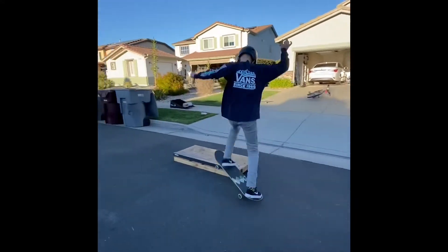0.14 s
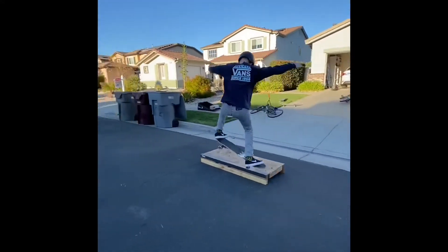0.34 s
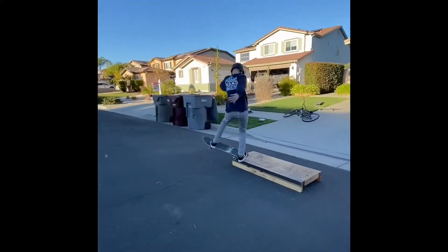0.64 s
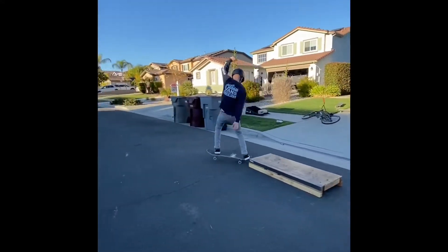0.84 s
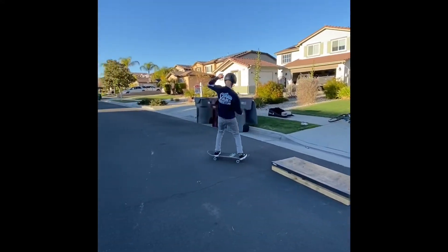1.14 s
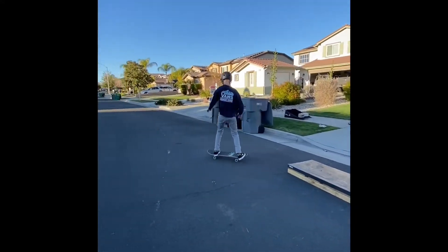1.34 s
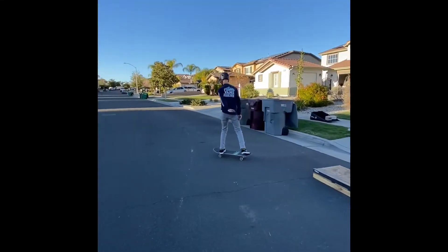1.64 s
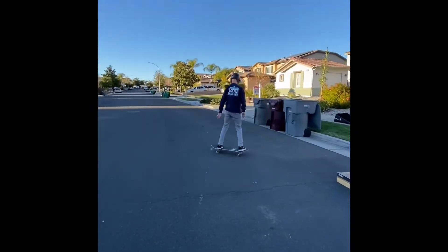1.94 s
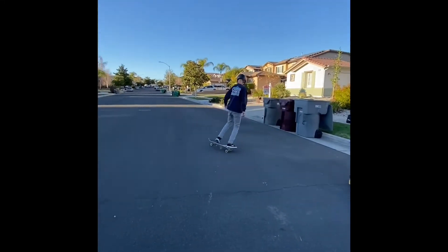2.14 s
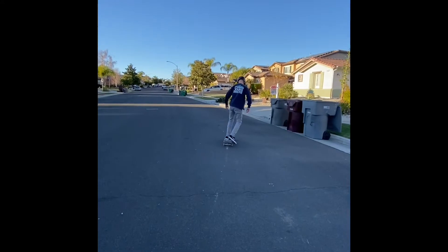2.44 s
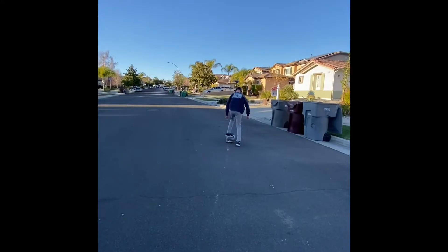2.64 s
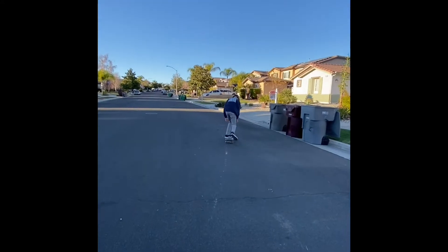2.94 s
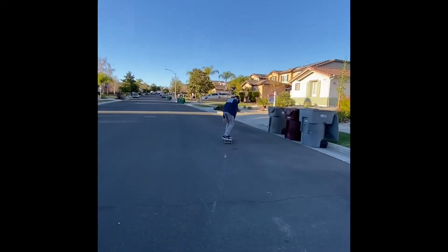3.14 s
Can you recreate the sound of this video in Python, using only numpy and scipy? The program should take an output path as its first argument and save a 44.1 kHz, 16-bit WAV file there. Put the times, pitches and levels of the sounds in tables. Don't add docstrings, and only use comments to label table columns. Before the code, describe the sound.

Skateboard pops, knocks across a hollow wooden box, lands with hard clacks, then rolls off gritty.

```python
import sys
import numpy as np
from scipy import signal
from scipy.fft import rfft, irfft, next_fast_len
from scipy.io import wavfile
from scipy.ndimage import uniform_filter1d

SR = 44100
rng = np.random.default_rng(int(sys.argv[2]) if len(sys.argv) > 2 else 0)


def gain_from_db(level_db):
    decades = np.asarray(level_db, float) / 20
    return 10 ** decades


def unload_audio(sound):
    columns = np.transpose(np.atleast_2d(sound))
    steps = np.round(np.clip(columns, -1, 1) * 32767)
    wavfile.write(sys.argv[1], SR, steps.astype(np.int16))


N = 145530


def evened(x):
    return x / np.sqrt(np.mean(x ** 2) + 1e-20)


def peaked(x):
    return x / abs(x).max()


def read(points, hz):
    f, value = np.transpose(points)
    return np.interp(np.log(hz + 1), np.log(f + 1), value)


def add(mix, s, sound):
    part = mix[round(max(s, 0) * SR):][:len(sound)]
    part += sound[:len(part)]


def colour(points):
    log_gain = read(points, abs(np.fft.fftfreq(4096, 1 / SR))) * np.log(10) / 20
    taps = np.fft.ifft(np.exp(np.conj(signal.hilbert(log_gain)))).real[:2048]
    return taps / np.linalg.norm(taps)


def coloured(x, taps):
    return signal.oaconvolve(x, taps)[:len(x)]


def ring(modes, detune, t):
    out = 0
    for (hz, db, t60), d in zip(modes, detune):
        out = out + gain_from_db(db - 60 * t / t60) * np.sin(2 * np.pi * hz * d * t)
    return out


# f/Hz, level/dB
STREET_COLOUR = [(20, -30), (50, -5.5), (100, 0.5), (170, -15.5), (600, -29.5), (1500, -38), (4000, -64),
                 (8000, -95)]


def street():
    a, b = rng.standard_normal((2, N))
    taps = colour(STREET_COLOUR)
    return gain_from_db(-48.5) * np.array([coloured(v, taps) for v in (a, .5 * a + .86 * b)])


# t/s, level/dB, f/Hz, t60/s
KNOCK = (2.5, -35.5, 421, 0.1)


def handling():
    s, db, hz, t60 = KNOCK
    modes = [(hz * ratio, db, t60) for ratio in (1, 0.48, 2.2)]
    knock = ring(modes, [1, 1, 1], np.arange(4000) / SR)
    out = np.zeros((2, N))
    add(out[0], s, coloured(knock, np.hanning(40) / 20))
    return out


# t/s, level/dB
CHIP_SNAPS = [(0.088, -36), (0.1366, -42), (0.17, -47), (0.198, -16), (0.4695, -31), (0.477, -31),
              (0.4894, -25), (0.6035, -34), (0.6205, -22), (0.635, -30), (0.6529, -18), (0.674, -34),
              (0.6917, -25), (0.7392, -40), (0.7821, -50), (0.83, -42), (0.8969, -39), (0.955, -36.5),
              (0.9862, -38), (1.0989, -43), (1.3019, -46), (1.3768, -50), (1.3897, -39), (1.4077, -40),
              (1.4655, -38), (1.5147, -35), (1.6033, -35), (1.6167, -32), (1.6454, -30), (1.704, -40),
              (1.8013, -33), (1.8342, -38), (1.891, -29.5), (1.9087, -34), (1.947, -35), (2.0657, -52),
              (2.0777, -33), (2.1034, -41), (2.18, -34), (2.2423, -38), (2.362, -31), (2.4488, -53),
              (2.476, -36), (2.4992, -39), (2.6549, -40), (2.6933, -39), (2.7906, -42), (3.2735, -43)]
# f/Hz, level/dB per Hz
CHIP_COLOUR = [(1500, -15), (3000, -4), (6000, -5), (9000, 6.5), (13000, -0.5), (16000, -8)]


def chips():
    rise_s, t60_s, trim_db = 0.00047, .018, 1.5
    t, out, taps = np.arange(900) / SR, np.zeros((2, N)), colour(CHIP_COLOUR)
    envelope = np.minimum(t / rise_s, 1) * gain_from_db(-60 * t / t60_s)
    for s, db in CHIP_SNAPS:
        for port, burst in zip(out, rng.standard_normal((2, len(t)))):
            add(port, s, gain_from_db(db + trim_db) * peaked(coloured(burst * envelope, taps)))
    return out


# t/s, level/dB, start f/Hz, end f/Hz, t60/s
DECK_FLEXES = [
    (.202, -16, 260, 150.7, 0.18),
    (0.479, -19.5, 301, 250, 0.079),
    (.537, -20.5, 260, 192, 0.11),
]


def flexes():
    sag_s = 0.0191
    t, out = np.arange(12000) / SR, np.zeros(N)
    for s, db, start_hz, end_hz, t60 in DECK_FLEXES:
        hz = end_hz + (start_hz - end_hz) * np.exp(-t / sag_s)
        add(out, s, gain_from_db(db - 60 * t / t60) * np.sin(2 * np.pi * np.cumsum(hz) / SR))
    return out


# t/s, contact level/dB, box or deck boom level/dB, grit hiss level/dB
WHEELS = [(0, -36, -1, -7), (.06, -45, -7, -11), (.19, -49, -12, -13), (0.231, -32, 6.5, -13.5),
          (0.302, -40, 6, -22), (.45, -32.5, 5.5, -20.5), (.57, -40, 11, -17.5), (.69, -37.5, 1, -2),
          (.74, -43.5, -0.8, -16), (1.15, -47, -4.5, -12.5), (1.36, -53.5, 1, -13.5),
          (1.6, -42.5, -5.5, -15), (1.87, -42, 3.5, -14.5), (2.42, -41.5, -9.5, -9.5),
          (2.6, -48, -2.5, -12.5), (2.78, -52, 1.5, -12), (3.122, -38, 0.5, -15.5), (3.3, -50.5, 1.5, -15)]
# f/Hz, level/dB per Hz
ROAR_COLOUR = [(400, -41), (650, 5.5), (950, 5.5), (1900, -0.5), (2250, -8.5), (2700, -17.5), (3400, -14.5),
               (4300, -34)]
BOOM_COLOUR = [(30, -23.5), (60, -4.5), (130, 3), (245, -0.5), (400, -4), (500, -4.5), (630, -13),
               (900, -44.5)]
HISS_COLOUR = [(1500, -9), (3200, -2.5), (4500, -7.5), (5600, -1), (7600, 1), (10500, -11.5), (15800, -20),
               (16400, -105)]
GRIT_SHARES = (.4, .15, .6)


def rolling():
    grit_per_s, grit_spread_db, bump_db, bump_s = 900, 3.6, 2.2, .012
    s, level_db, boom_db, hiss_db = np.transpose(WHEELS)
    t, width = np.arange(N) / SR, round(bump_s * SR)
    bumps = uniform_filter1d(rng.standard_normal(N), width)
    bumps = evened(uniform_filter1d(bumps, width))
    grain_db = grit_spread_db * np.minimum(rng.exponential(1, N), 2.8)
    grit = gain_from_db(grain_db) * (rng.random(N) < grit_per_s / SR)
    level = gain_from_db(np.interp(t, s, level_db) + bump_db * bumps)
    layers = [(ROAR_COLOUR, 1.5),
              (BOOM_COLOUR, -2 + np.interp(t, s, boom_db)),
              (HISS_COLOUR, 8 + np.interp(t, s, hiss_db))]
    out = np.zeros((2, N))
    for (points, db), share in zip(layers, GRIT_SHARES):
        for path in out:
            grains = evened(grit * rng.standard_normal(N))
            road = share * grains + np.sqrt(1 - share ** 2) * rng.standard_normal(N)
            add(path, 0, coloured(level * gain_from_db(db) * road, colour(points)))
    return out


# f/Hz, level/dB, t60/s
DECK_MODES = [(799, 5.5, 0.062), (965, 11, 0.03), (1300, -14, 0.026), (1480, -43, 0.063),
              (1770, -7.5, 0.097), (2120, -4, 0.032), (2300, 2.5, 0.0079), (2825, -3, 0.012),
              (3340, 2, 0.0027), (5130, 2, 0.0038), (5420, -18, .012)]
# f/Hz, level/dB, t60/s
WOOD_MODES = [(165, -3, .12), (205, -3, .1), (248, 1.5, .15), (335, -5, .1), (397, -5, .09),
              (470, -13, .05)]


def blow(peak_db, truck_hz, length, thud_db, tick_db, truck_db, roar, hiss):
    t = np.arange(9000) / SR
    detune, shake = rng.uniform(0.955, 1.068, 20), rng.standard_normal((3, len(t)))
    swell = np.minimum(t / (0.28 * length), 1) * np.exp(-2 * t / length)
    contacts = swell * shake[0] * (0.32 + (abs(shake[1]) > 1.8))

    body = ring(DECK_MODES, detune, t) * gain_from_db(-20.5)
    body = body + ring([(truck_hz, truck_db, 0.038)], [1], t)
    hit = peaked(signal.fftconvolve(contacts, body)[:len(t)])
    clack = np.sin(2 * np.pi * truck_hz * t) * t * np.exp(-t / min(.3 * length, .002))
    crack = peaked(coloured(contacts, roar))
    clack_db = -5 + truck_db + 13
    metal = peaked(hit + gain_from_db(clack_db) * peaked(clack) + gain_from_db(0.5) * crack)

    push = np.exp(-t / .0007) * t
    thud = peaked(signal.fftconvolve(push, ring(WOOD_MODES, np.ones(6), t))[:len(t)])
    snap = np.diff(contacts * swell, prepend=0)
    tick = peaked(coloured(contacts, hiss) + gain_from_db(-10) * snap)

    tail = coloured(shake[2], roar) + gain_from_db(-16) * coloured(shake[1], hiss)
    tail = tail * np.minimum(t / 0.011, 1) * gain_from_db(-20.5 - 60 * t / 0.14)
    return gain_from_db(peak_db) * (metal + gain_from_db(thud_db) * thud + gain_from_db(tick_db) * tick + tail)


# t/s, peak level/dB, truck ring f/Hz, rattle length/s, wood thud level/dB
HARD_BLOWS = [(.000, -16.5, 1560, .02, -11), (0.192, -13, 1080, 0.0041, -24),
              (0.199, -3.5, 1075, 0.008, -10), (0.201, -6.5, 950, 0.012, -6.5),
              (0.214, -12.5, 1300, .012, -4), (0.222, -11, 1780, 0.0016, -7),
              (0.469, -13, 1700, 0.0051, -33), (0.478, -6, 1524, 0.014, -6),
              (0.502, -1.5, 1784, 0.0079, -10), (.504, -6, 1010, 0.011, -12),
              (0.524, -11.5, 2300, 0.0066, -1), (0.541, -24.5, 1530, 0.0057, -3),
              (0.516, -15.5, 2050, 0.0067, -10), (0.534, -20, 2220, 0.015, -15),
              (0.205, -10, 1916, 0.0077, -7), (2.188, -26, 2650, 0.0021, -23),
              (0.606, -11, 3495, 0.0042, -20), (.675, -20, 3350, 0.0027, -25),
              (0.604, -12.5, 1680, 0.006, -21), (0.618, -17, 1510, 0.03, -19),
              (0.653, -9, 1300, 0.0058, -16), (0.675, -4, 1300, 0.0068, -18),
              (0.694, -9, 1605, 0.0048, -43), (2.069, -40, 1750, 0.0022, -20),
              (2.079, -10.5, 1660, 0.0034, -51), (2.0775, -14, 2870, 0.0023, -45),
              (2.093, -26, 1720, 0.013, -24), (2.18, -16, 766, 0.009, -12)]
# t/s, peak level/dB, truck ring f/Hz
WHEEL_TRIPS = [(0.09, -17.5, 1200), (0.171, -30, 1060), (0.266, -18, 940), (0.830, -31, 1540),
               (0.866, -34, 1120), (1.045, -27, 2170), (1.083, -23, 1040), (1.129, -23.5, 1620),
               (1.302, -31, 850), (1.392, -31.5, 1530), (1.464, -27, 1760), (1.515, -23, 1370),
               (1.605, -28, 1160), (1.619, -23, 970), (1.638, -23, 1560), (1.799, -16, 1430),
               (1.832, -21, 1350), (1.891, -20.5, 980), (1.998, -20.5, 1310), (2.037, -21.5, 1670),
               (2.241, -20, 1900), (2.279, -20, 1980), (2.325, -18, 1780), (2.37, -18.5, 1990),
               (2.448, -29, 2080), (2.478, -17.5, 1610), (2.739, -29.5, 1940), (2.794, -49, 1710),
               (2.833, -30, 945), (3.143, -15.5, 840)]


def impacts():
    # s, peak dB, truck Hz, rattle s, thud dB, tick dB, truck dB
    rows = [(*row, -10, -13) for row in HARD_BLOWS]
    rows += [(s, db - 6, hz, .007, -20, -9, -17) for s, db, hz in WHEEL_TRIPS]
    out, roar, hiss = np.zeros((2, N)), colour(ROAR_COLOUR), colour(HISS_COLOUR)
    for s, *settings in rows:
        sound = blow(*settings, roar, hiss)
        scatter = rng.standard_normal(300) * np.exp(-np.arange(300) / 180.0)
        add(out[0], s, sound)
        add(out[1], s, coloured(sound, scatter / np.linalg.norm(scatter)))
    low_cut = signal.butter(4, 127, "high", fs=SR, output="sos")
    return signal.sosfilt(low_cut, out)


# f/Hz, lead/rad
PORT_LEAD = [(340, -.1), (690, -3.4), (1380, -5.5), (5600, -6.2), (7400, -3.14), (10700, 0), (13400, 3.14),
             (16000, 6.2)]
# f/Hz, level/dB
PORT_BALANCE = [(60, 0), (100, -3), (170, -10), (340, -17), (700, -5), (1300, -3), (2400, -1), (6500, 0)]
# f/Hz, likeness [0-1]
PORT_LIKENESS = [(60, .6), (400, .65), (650, .985), (2100, .92), (2600, .55), (4400, .55), (6800, .94),
                 (12000, .997)]


def ports(x, other):
    stair, stair_from_hz, unalike = .45, 6000, .25
    size = next_fast_len(N + 4096)
    hz = np.fft.rfftfreq(size, 1 / SR)
    lead, high = read(PORT_LEAD, hz), hz > stair_from_hz
    same = read(PORT_LIKENESS, hz) - high * unalike * np.sin(lead) ** 10
    for _ in range(3):
        lead = lead - high * stair * np.sin(2 * lead)
    turn = np.exp(.5j * lead) * gain_from_db(read(PORT_BALANCE, hz) / 2)
    a, b = rfft(x, size), rfft(other, size)
    left = a * turn
    right = (same * a + np.sqrt(1 - same ** 2) * b) / turn
    return irfft(np.array([left, right]), size)[:, :N]


def scene():
    direct, reflected = rolling() + impacts() + flexes()
    return street() + handling() + chips() + ports(direct, reflected)


def band_limit(x):
    return signal.sosfilt(signal.butter(12, 17020, fs=SR, output="sos"), x)


def record(dry):
    edge = signal.firwin(255, 15900, window=("kaiser", 9), fs=SR)
    mix = np.clip(signal.oaconvolve(dry, edge[None], "same"), -.95, .95)
    return band_limit(mix)


dry = scene()
out = record(dry)
unload_audio(out)
```